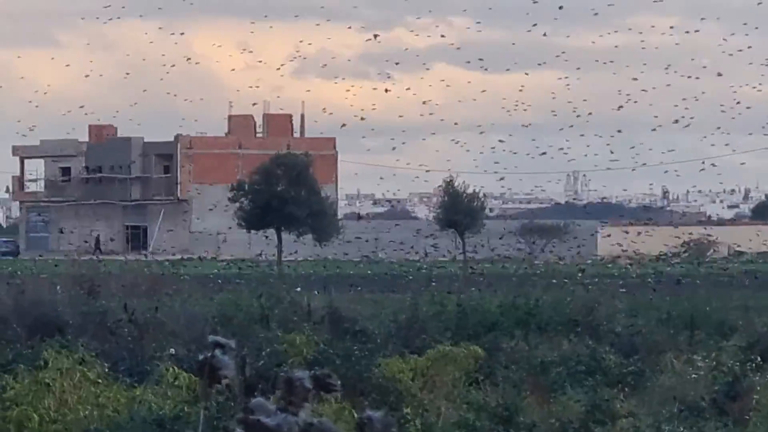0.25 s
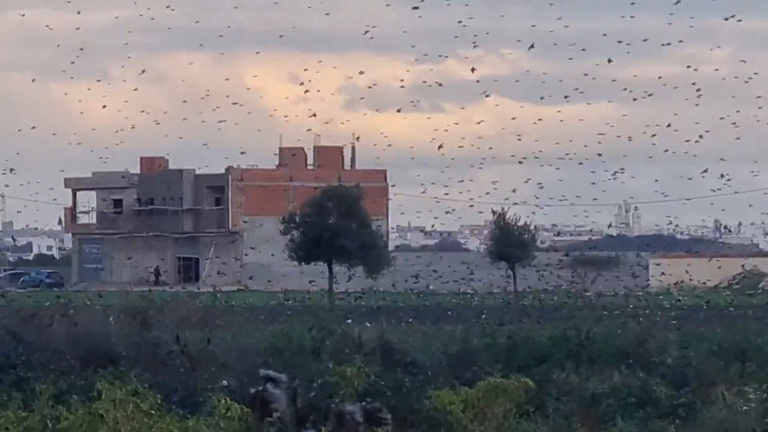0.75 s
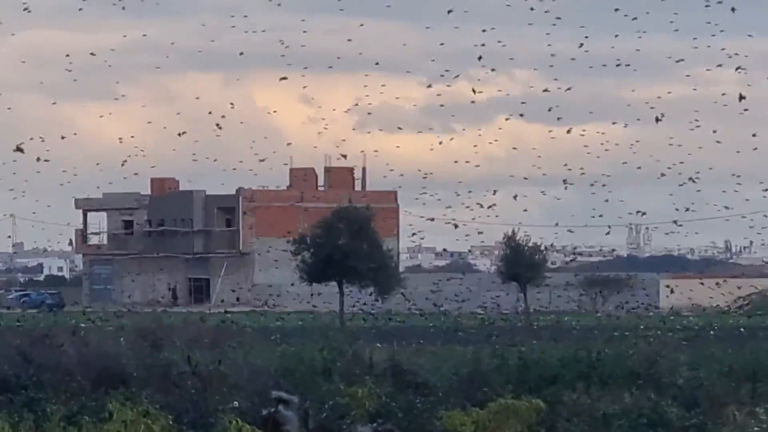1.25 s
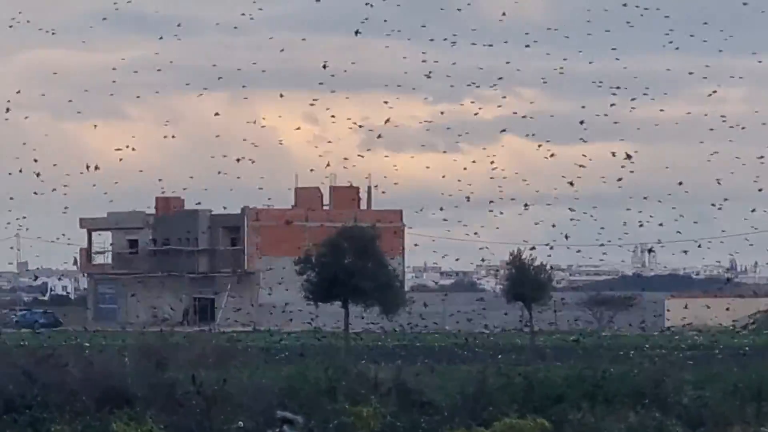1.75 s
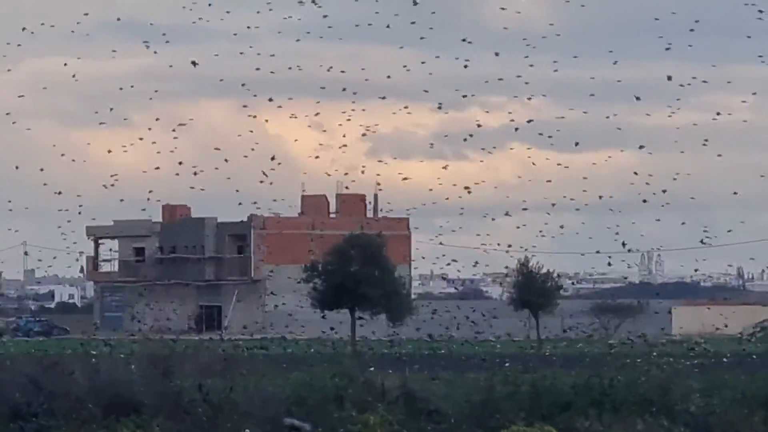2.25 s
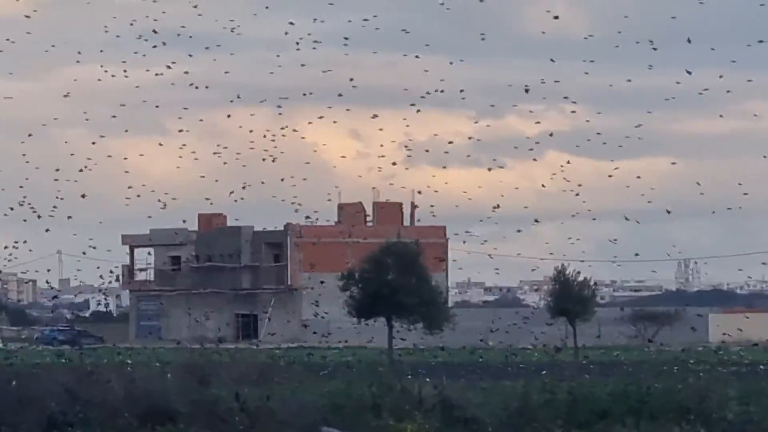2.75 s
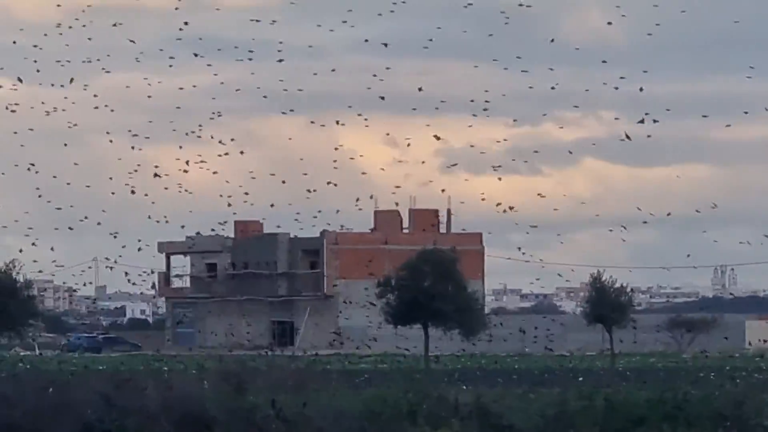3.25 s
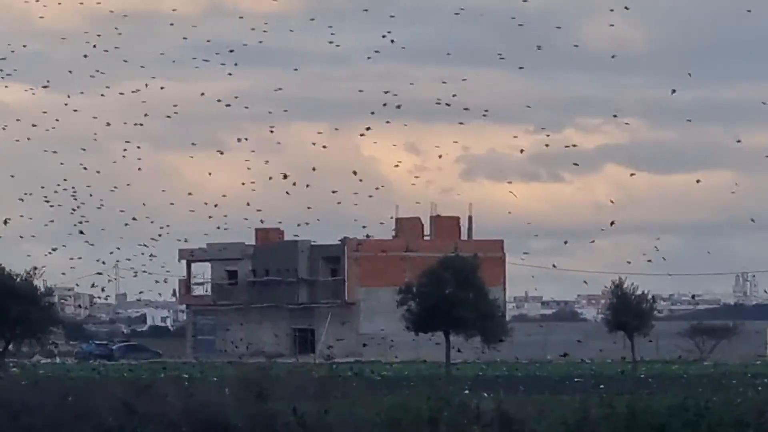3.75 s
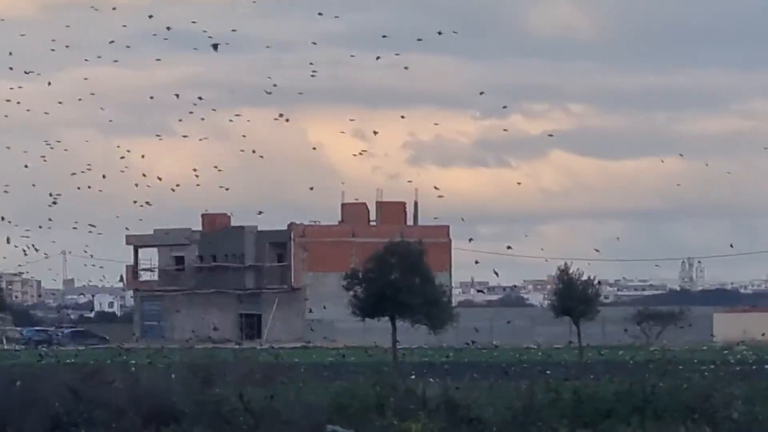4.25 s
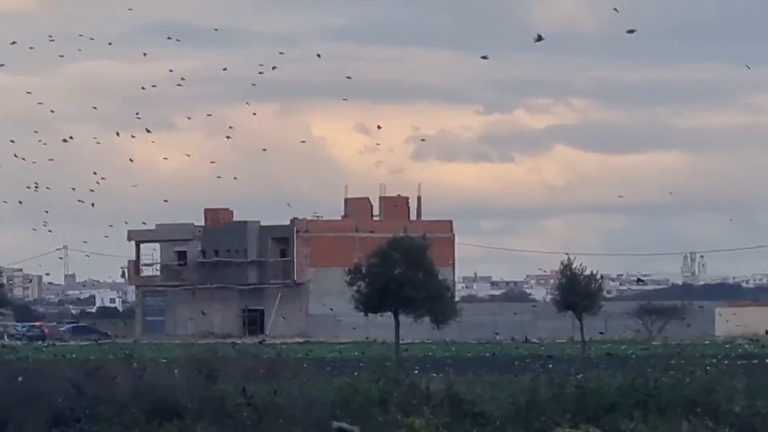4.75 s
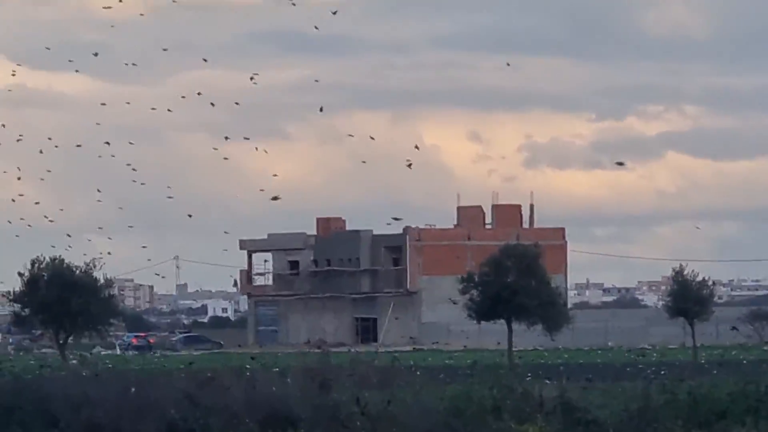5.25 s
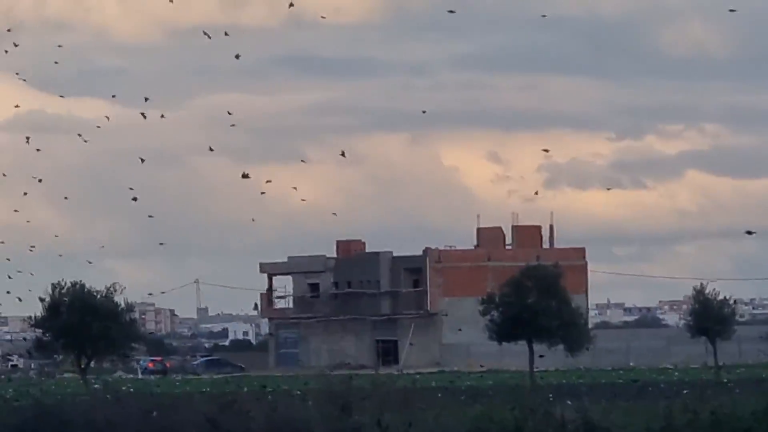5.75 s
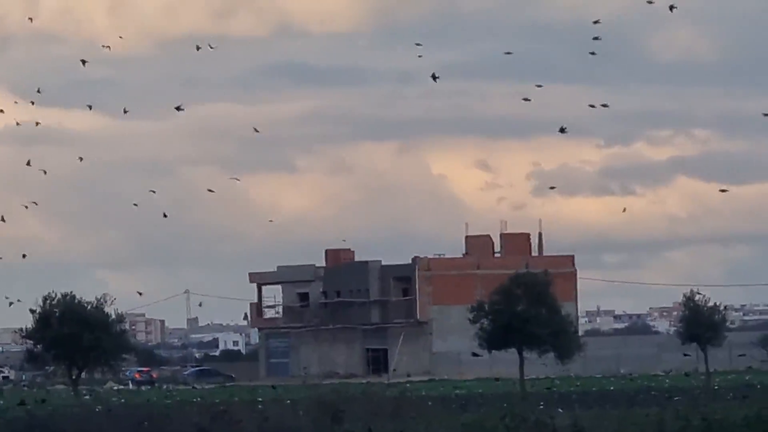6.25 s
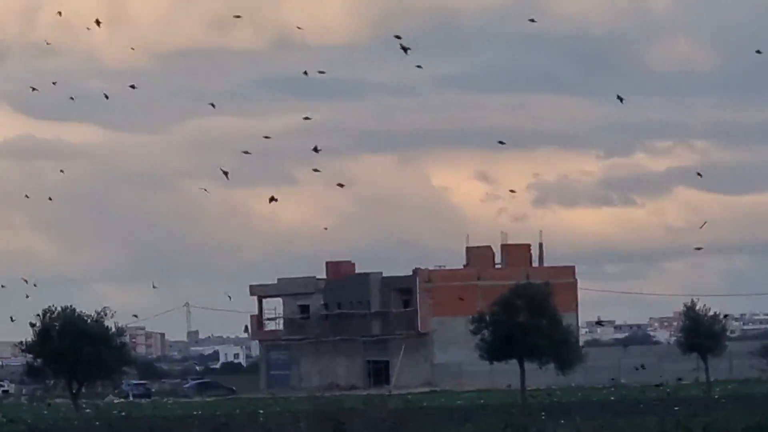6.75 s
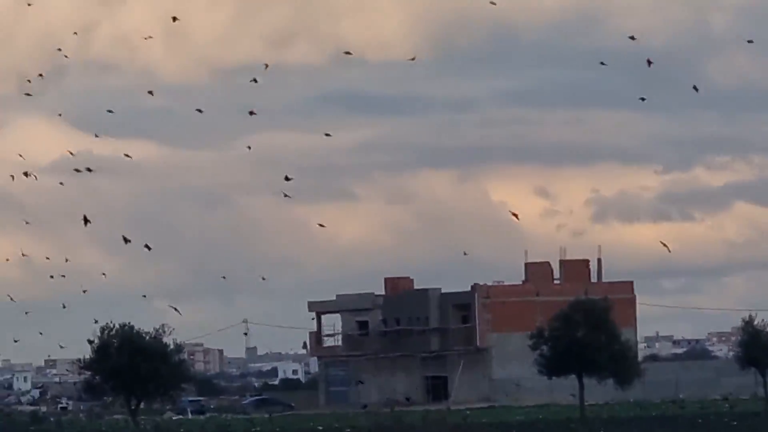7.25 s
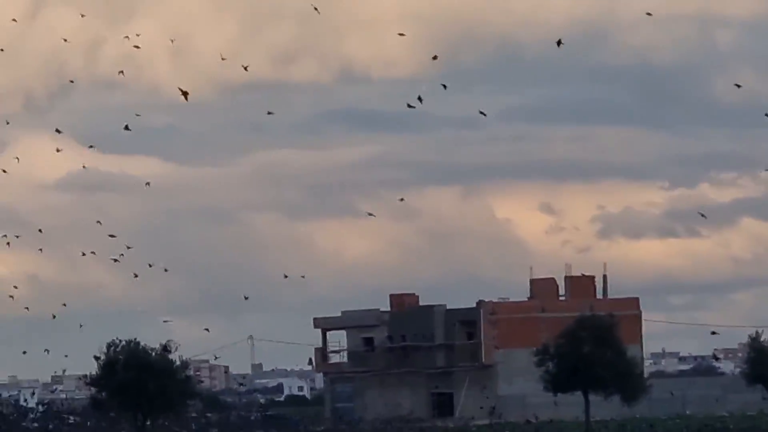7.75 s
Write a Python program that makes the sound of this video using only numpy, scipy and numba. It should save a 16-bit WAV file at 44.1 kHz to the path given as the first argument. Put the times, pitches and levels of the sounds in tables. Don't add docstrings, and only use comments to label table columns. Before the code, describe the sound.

A continuous, dense sheet of bird chatter fills a wide outdoor space from the start, leaning left. Tiny descending chirps merge into a sizzling texture, with irregular near whistles and low rasps on top. Far heavy engines throb in the bass, stronger in the first half and dropping briefly before two seconds. Faint tyre hiss and narrow passing whines come from the right. The stereo pickup is open, with little echo and slight hiss.

```python
import sys
import numpy as np
from scipy import signal
from scipy.fft import rfft, irfft, next_fast_len
from scipy.io import wavfile
from scipy.ndimage import uniform_filter1d, map_coordinates
from numba import njit

SR = 44100
rng = np.random.default_rng(int(sys.argv[2]) if len(sys.argv) > 2 else 0)


def invert_db(level):
    return 10 ** (np.asarray(level, dtype=float) / 20)


def transcribe(signal):
    frames = np.atleast_2d(signal).T
    limited = np.clip(frames, -1, 1)
    pcm = np.round(limited * 32767).astype(np.int16)
    wavfile.write(sys.argv[1], SR, pcm)


N = 353108
PORT_LAG = 22 / SR


def unit(x):
    return x / np.sqrt(np.mean(x ** 2) + 1e-20)


def along(points, hz):
    point_hz, value = np.transpose(points)
    return np.interp(np.log(hz + 1), np.log(point_hz + 1), value)


def curves(rows):
    time_s, *columns = np.transpose(rows)
    t = np.arange(N) / SR
    return [np.interp(t, time_s, column) for column in columns]


def wobble(rate):
    knots = rng.standard_normal(int(N * rate / SR) + 4)
    return map_coordinates(knots, [np.arange(N) * rate / SR])


def filtered(x, response):
    m = next_fast_len(N + 8192)
    hz = np.fft.rfftfreq(m, 1 / SR)
    return irfft(rfft(x, m) * response(hz), m)[..., :N]


def at_ports(shared, own, alike, lag):
    def share(hz):
        return np.clip(along(alike, hz), 0, 1)

    def arrive(hz):
        half_lag_each_way = np.exp(1j * np.pi * hz * lag * np.array([[1], [-1]]))
        return np.sqrt(share(hz)) * half_lag_each_way

    return filtered(shared, arrive) + filtered(own, lambda hz: np.sqrt(1 - share(hz)))


def wash(spectrum, alike, lag, patchy_db):
    z = signal.stft(rng.standard_normal((3, N)), nperseg=512)[2]
    field = rng.standard_normal(z.shape[1:])
    field = uniform_filter1d(field, size=4, axis=0)
    field = uniform_filter1d(field, size=20, axis=1)
    noise = signal.istft(z * invert_db(patchy_db * unit(field)), nperseg=512)[1][:, :N]
    stereo = at_ports(noise[0], noise[1:], alike, lag)
    return unit(filtered(stereo, lambda hz: invert_db(along(spectrum, hz))))


def gusts(calm_db, swells, width_s):
    t = np.arange(N) / SR
    gain = invert_db(calm_db)
    for s, db in swells:
        gain = gain + invert_db(db) * np.exp(-((t - s) / width_s) ** 2)
    return 20 * np.log10(gain)


def lorries():
    # start_s, pitch_hz
    shaft_turns = [(0, 25.2), (1.3, 26), (2.2, 26.6), (3.5, 27.3), (4.5, 27.8), (6.0, 27.8), (8.01, 27.6)]
    # start_s, level_db
    drone_carry = [(0, -44), (.5, -39.5), (1.05, -41.5), (1.31, -33), (1.6, -46), (1.95, -38),
                   (2.25, -33.5), (2.55, -42), (2.95, -44.5), (3.5, -35.5), (4.1, -37.5), (4.26, -33),
                   (4.64, -38), (5.0, -43), (5.4, -47.5), (6.0, -43), (6.8, -48.5), (8.01, -47)]
    # centre_s, level_db
    steady_swells = [(0, -32.5), (.4, -35.5), (.8, -47), (1.6, -43), (1.94, -38), (2.5, -58), (3.5, -40),
                     (4.12, -46), (4.62, -35), (5.619, -38), (5.9, -41.5), (6.3, -45), (7.35, -52),
                     (4.35, -51), (5.1, -45), (2.3, -42), (7.74, -40), (6.5, -49), (6.85, -41)]
    # start_s, pitch_hz
    climb_pitch = [(0, 74.2), (1, 77.4), (2, 81), (2.7, 84.28), (4, 85.37), (6, 86.26), (8.01, 85.5)]
    # centre_s, level_db
    climb_swells = [(.25, -46), (.8, -50), (1.3, -49), (1.6, -45), (2.0, -50), (2.5, -44.5), (3.0, -41.5),
                    (3.62, -41), (4.05, -47), (5.0, -43.5), (5.4, -49), (6.2, -54), (6.75, -46.5),
                    (7.72, -41.5), (7.95, -59)]
    # start_s, pitch_hz, level_db
    pulling_lorry = [(0, 128, -79), (1.92, 132.5, -73), (2.67, 136.5, -72), (3.05, 140.3, -55),
                     (4.5, 146.8, -59.5), (5.3, 150.3, -61.5), (6.2, 151.9, -53), (7.0, 151.2, -65),
                     (8.01, 148.5, -63.5)]
    # start_s, pitch_hz, level_db
    pull_undertone = [(0, 68, -62), (1.4, 69, -42), (2.3, 70.5, -50), (3.7, 72, -51), (4.4, 72, -45),
                      (5.5, 71.7, -46), (6.8, 72, -48.5), (8.01, 70.3, -51)]
    # pitch_hz, density_db (per Hz)
    rumble_colour = [(15, -30), (25, -14), (40, -1.5), (50, 1), (62, -5), (75, 2.5), (92, -6.5), (130, -14),
                     (180, -27.5), (300, -38), (500, -76.5)]

    (shaft_hz,), (drone_db,) = curves(shaft_turns), curves(drone_carry)
    (climb_hz,), (pull_hz, pull_db) = curves(climb_pitch), curves(pulling_lorry)
    under_hz, under_db = curves(pull_undertone)
    t = np.arange(N) / SR
    voices = [
        (2 * shaft_hz, drone_db + 2.2 * wobble(7), .5),
        (63.6 + 0 * t, gusts(-46.5, steady_swells, width_s=0.071), 1.0),
        (climb_hz, gusts(-54.5, climb_swells, width_s=0.14), .8),
        (pull_hz, pull_db - 1, .25),
        (under_hz, under_db + 1.9 * wobble(5), .8),
        (shaft_hz, -62.5 + 3 * wobble(3), 1.0)]
    tones = np.zeros(N)
    for hz, db, shake_hz in voices:
        phase = 2 * np.pi * np.cumsum(hz + shake_hz * wobble(6)) / SR
        tones += invert_db(db) * np.cos(phase)
    tones = at_ports(tones, 0 * tones, [(50, 0.65)], PORT_LAG) * invert_db([[-.5], [.5]])

    lull_s, lull_length_s, lull_db = 1.757, 0.11, -16
    lull = invert_db(lull_db * np.exp(-((t - lull_s) / lull_length_s) ** 4))
    likeness = [(25, 0.63), (60, 0.92), (130, 1.0), (300, 1.0)]  # Hz, left-right share
    rumble = invert_db(-46.0 + 0.96 * wobble(3.1)) * wash(rumble_colour, likeness, PORT_LAG, patchy_db=1.5)
    return lull * tones + rumble


def road():
    # start_s, level_db
    traffic = [(0, -55.5), (.35, -57), (1.2, -56.5), (2.07, -56.5), (2.4, -56.5), (2.85, -57), (3.12, -56),
               (3.73, -58.5), (4.97, -56.5), (5.46, -58), (6.62, -57), (7.16, -56.5), (8.01, -56.5)]
    # pitch_hz, density_db (per Hz)
    body_colour = [(100, -29), (170, -3.5), (448, -4), (545, 0), (647, -3), (877, -2), (1100, -15),
                   (1430, -21), (2420, -120)]
    # pitch_hz, density_db (per Hz)
    tyre_colour = [(530, -18.5), (900, -1.5), (1090, -2), (1410, -1), (1670, -3.5), (1970, -1.5),
                   (2330, -10), (2600, -9), (3380, -33.5), (5720, -120)]
    # pitch_hz, share (0 to 1)
    road_alike = [(200, 0.9), (350, 0.69), (600, 0.48), (900, 0.16), (1400, 0.25), (2500, 0.38)]
    # start_s, length_s, pitch_hz, width_hz, level_db
    tyre_whines = [(1.8, .5, 890, 40, -62), (2.2, .65, 885, 30, -61), (1.93, .22, 1130, 80, -60),
                   (6.9, .8, 600, 110, -59.5), (3.05, .3, 1400, 80, -65), (1.5, 1.3, 760, 160, -59.5),
                   (6.9, 1.1, 800, 150, -60), (2.2, .45, 370, 40, -66), (3.4, .35, 310, 50, -65),
                   (4.45, .95, 280, 50, -66), (5.0, .25, 970, 70, -64)]

    traffic_db, = curves(traffic)
    mean_db = traffic_db.mean()
    swing_db = traffic_db - mean_db
    body_db = mean_db + 0.48 * swing_db
    hiss_db = mean_db - 1 + 1.9 * swing_db
    body = invert_db(body_db + 1.0) * wash(body_colour, road_alike, lag=-3e-5, patchy_db=1.06)
    hiss = invert_db(hiss_db + 3.0) * wash(tyre_colour, road_alike, lag=-0.000074, patchy_db=1.4)
    t = np.arange(N) / SR
    whines = np.zeros(N)
    for s, length, hz, width, db in tyre_whines:
        arch = np.sin(np.pi * np.clip((t - s) / length, 0, 1))
        band = filtered(rng.standard_normal(N), lambda f: np.exp(-((f - hz) / width) ** 2))
        whines += invert_db(db) * arch * unit(band)
    return body * invert_db([[-.7], [.7]]) + hiss * invert_db([[-1.6], [1.6]]) + whines * invert_db([[-1.5], [1.5]])


@njit
def chirps(rows, n, rate, bend, warble_hz):
    out = np.zeros(n + rate)
    for s, length, hz0, hz1, gain, flutter, depth in rows:
        phase = 0.0
        steps = int(length * rate)
        for i in range(steps):
            u = i / steps
            shake = depth * np.sin(2 * np.pi * flutter * (s + u * (1 + u) * length))
            hz = hz0 + (hz1 - hz0) * u ** bend + warble_hz * shake
            phase += 2 * np.pi * hz / rate
            out[int(s * rate) + i] += gain * np.sqrt(np.sin(np.pi * u)) * (1 + shake) * np.sin(phase)
    return out[:n]


def passers():
    u = rng.random((30, 5))
    start_s = u[:, 0] * (N / SR - .1)
    length_s = 0.013 + 0.047 * u[:, 2]
    hz = 2600 + 5200 * u[:, 1]
    end_hz = hz * (1.02 - 0.2 * u[:, 3] ** 2)
    db = -64 + 2 * (2 * u[:, 4] - 1) - 2.0 * np.abs(hz - 4500) / 1000
    return np.transpose([start_s, length_s, hz, end_hz, db])


def near_birds():
    # start_s,
    # length_s, start_hz, end_hz, level_db
    single_calls = [(.678, .028, 7400, 6200, -55), (.79, .025, 7800, 7000, -59), (1.032, .021, 7090, 7000, -57),
                    (1.092, .016, 6600, 8100, -51), (1.108, .026, 8050, 6200, -46),
                    (1.135, .055, 5500, 4900, -47), (1.235, .05, 7500, 6800, -56),
                    (1.365, .03, 8000, 5600, -54), (1.385, .03, 7600, 5600, -54),
                    (1.435, .026, 7180, 6370, -55), (1.575, .068, 6800, 6030, -58),
                    (1.668, .022, 5450, 5400, -49), (1.85, .025, 7000, 6250, -52),
                    (2.515, .03, 5300, 4500, -51), (2.802, .03, 6370, 5400, -51),
                    (3.242, .017, 7050, 5950, -57), (3.618, .024, 4800, 4350, -49),
                    (3.822, .022, 7250, 6250, -52), (5.027, .038, 5800, 5170, -53),
                    (5.364, .048, 6660, 5000, -54), (5.683, .028, 5510, 5080, -52),
                    (5.715, .019, 5970, 5710, -52), (6.297, .039, 7650, 6420, -59),
                    (7.426, .052, 6650, 6190, -59),
                    (.39, .035, 4900, 4000, -50), (.405, .05, 4300, 3500, -54), (1.187, .068, 3770, 3840, -54),
             (1.469, .023, 5000, 5000, -55), (1.689, .057, 4820, 4700, -54), (1.745, .03, 4150, 3800, -49),
             (2.029, .041, 4440, 4720, -54), (2.119, .039, 5030, 4710, -53), (2.199, .034, 3960, 3690, -51),
             (2.895, .028, 4630, 4520, -54), (3.259, .035, 4900, 4300, -52), (3.352, .02, 3800, 3850, -55),
             (3.458, .016, 4400, 4150, -49), (3.475, .04, 3850, 3650, -50), (4.088, .05, 3800, 3650, -52),
             (4.618, .022, 3740, 3490, -54), (5.715, .042, 4770, 4770, -52), (5.721, .019, 3790, 3790, -52),
             (6.285, .03, 5000, 4750, -51), (6.305, .017, 3500, 3900, -52), (6.393, .039, 2810, 2810, -54),
             (6.494, .023, 4290, 4370, -51), (7.223, .028, 4800, 4290, -53), (7.445, .025, 4400, 4000, -53),
             (7.455, .045, 3900, 3600, -51),
                    (.503, .042, 4820, 4820, -57), (1.255, .036, 5460, 5460, -56),
               (1.493, .039, 4310, 4230, -55), (1.617, .057, 7360, 7160, -60),
               (1.79, .055, 3350, 2900, -57), (1.869, .03, 4250, 3900, -53), (2.44, .035, 4900, 4400, -55),
               (2.57, .065, 4050, 3450, -54), (2.656, .048, 4370, 4330, -54), (2.93, .02, 4150, 3950, -53),
               (2.97, .04, 4000, 3650, -53), (3.432, .035, 6250, 5180, -57), (4.259, .057, 2970, 2880, -59),
               (4.634, .036, 4900, 4750, -57), (5.422, .03, 5300, 4500, -53), (5.525, .03, 4250, 4150, -52),
               (5.574, .018, 3680, 3720, -53), (5.756, .025, 4140, 4050, -53),
               (6.117, .036, 3850, 3550, -55), (6.278, .025, 5350, 5550, -53),
               (7.149, .042, 4360, 4360, -56), (7.726, .074, 3720, 3610, -58),
                    (.39, .04, 5000, 4300, -52), (.453, .04, 3270, 3110, -54), (1.0, .04, 6540, 6380, -59),
              (1.118, .035, 6600, 5270, -57), (1.161, .04, 7040, 6320, -58), (1.377, .04, 5560, 5560, -54),
              (1.429, .04, 7100, 7400, -60), (1.554, .04, 7990, 6390, -58), (1.625, .04, 4250, 4400, -54),
              (1.715, .018, 4300, 4450, -51), (1.79, .018, 4100, 4200, -53), (2.097, .045, 7090, 7290, -58),
              (2.525, .035, 4770, 4370, -52), (2.585, .02, 5050, 4950, -53), (2.72, .045, 3700, 3300, -55),
              (2.452, .02, 4450, 4600, -53), (4.08, .06, 3050, 2900, -60), (2.949, .035, 3750, 2800, -56),
              (2.995, .04, 5980, 5820, -58), (2.999, .04, 3630, 3030, -56), (3.358, .04, 3960, 2840, -55),
              (3.485, .03, 4000, 3550, -51), (3.535, .025, 5000, 4950, -54), (4.6, .04, 4810, 3210, -53),
              (4.785, .04, 6140, 6340, -58), (5.39, .04, 3350, 3190, -56), (5.385, .035, 5400, 5050, -53),
              (5.49, .035, 4150, 4300, -53), (5.6, .016, 3750, 3650, -54), (5.775, .04, 7440, 7640, -61),
              (5.835, .025, 4300, 4350, -54), (6.252, .04, 2760, 2760, -55), (6.325, .028, 3800, 3680, -50),
              (6.348, .02, 3650, 3300, -55), (6.441, .045, 4050, 3750, -55), (6.539, .04, 7480, 7080, -60),
              (7.553, .04, 5850, 6130, -59)]
    overhead = [
        (5.277, .035, 7010, 7010, -67),
        (5.335, .1, 7020, 7000, -66),
        (5.43, .13, 6980, 6850, -71),
    ]
    # pitch_hz, level_db
    port_shadow = [(2800, 0), (3800, -2), (4400, -9), (5100, -4), (6000, -8), (7500, -9.5)]

    rows = np.vstack([single_calls, passers(), overhead])
    s, length, hz0, hz1, right_db = rows.T
    above = np.arange(len(s)) >= len(s) - len(overhead)
    left_db = right_db + np.where(above, 6, along(port_shadow, (hz0 + hz1) / 2))
    flutter_hz = 25 + 35 * rng.random(len(s))
    depth = np.interp(hz0, [5000, 6500], [.6, .12])

    def heard(db, lag):
        port = np.transpose([s + lag, length, hz0, hz1, invert_db(db + 2), flutter_hz, depth]).copy()
        return chirps(port, N, SR, bend=0.9, warble_hz=117.0)

    calls = np.array([heard(left_db, 0), heard(right_db, PORT_LAG * ~above)])
    t = np.arange(SR // 4) / SR
    scatter = rng.standard_normal((2, len(t))) * invert_db(-60 * t / 0.23)
    scatter = invert_db(-10) * scatter / np.linalg.norm(scatter[0])
    return calls + signal.fftconvolve(calls, scatter, axes=1)[:, :N]


def chatter(count, spread_db, fall):
    u = rng.random((count, 5))
    nearness = np.minimum(rng.exponential(size=count), 3.5)
    middle_hz = 1500 + 8000 * u[:, 1]
    sweep_hz = fall * middle_hz ** 2 / 5500 * (u[:, 2] - .2)
    lead = SR // 10
    start_s = u[:, 0] * (N + lead) / SR
    length_s = .018 + .045 * u[:, 3] ** 2
    flutter_hz, depth = 25 + 90 * u[:, 4], 0.26 + .5 * u[:, 3]
    rows = [start_s, length_s, middle_hz + sweep_hz, middle_hz - sweep_hz,
            invert_db(spread_db * nearness), flutter_hz, depth]
    calls = chirps(np.transpose(rows).copy(), N + lead, SR, bend=.8, warble_hz=176.0)
    return unit(calls[lead:])


def flock():
    # start_s, chatter_db, extra_treble_db
    mass_nearness = [(0, -52.5, -5), (.3, -53, -1), (.6, -53.5, 3), (1.1, -52, -0.5), (1.6, -52, -2),
                     (1.9, -52, -1.5), (2.2, -52.5, 0.5), (2.7, -53.5, 1.5), (3.1, -53.5, -2),
                     (3.5, -53.5, 0.5), (4.3, -53.5, 0.5), (4.9, -54, 0), (5.4, -53.5, -2), (5.75, -53, -2),
                     (6.3, -53, 0), (6.9, -54, 0), (7.45, -53, 0), (8.01, -53.5, -2)]
    # pitch_hz, level_db
    left_colour = [(1500, 8), (2000, 4), (2400, 0), (2800, 1), (3300, 1), (3850, -2.5), (4200, -2),
                   (4650, -3.5), (4900, -2), (5600, -5), (6000, -10.5), (6250, -8), (6500, -11.5),
                   (6900, -8), (7500, -15.5), (7900, -14.5), (8200, -19), (9400, -28)]
    # pitch_hz, level_db
    right_colour = [(1500, 5.5), (2000, 6.5), (2400, -11), (2800, -0.5), (3300, -0.6), (3800, 1.5),
                    (4400, 2.5), (5000, 1.5), (5600, -2), (6000, -8.5), (6400, -5.5), (6900, -3.5),
                    (7500, -7), (7900, -15.5), (8200, -21), (9400, -45.5)]
    # pitch_hz, share (0 to 1)
    from_left = [(1500, 1), (3000, 0.26), (5000, 0.23), (7000, 0.078), (9000, 0.06)]

    chatter_db, turn_db = curves(mass_nearness)
    treble_db = -10.5 + 1.3 * (chatter_db - chatter_db.mean()) + turn_db + .6 * wobble(7)
    voices = []
    for _ in range(3):
        hiss = invert_db(-1.5) * rng.standard_normal(N)
        voices.append(chatter(count=10000, spread_db=0.9, fall=0.1686) + hiss)
    mass = at_ports(voices[0], np.array(voices[1:]), from_left, PORT_LAG)

    def colour(hz):
        ports = invert_db([along(left_colour, hz), along(right_colour, hz)])
        return ports / (1 + (hz / 9500) ** 30)

    def low_band(hz):
        return colour(hz) / (1 + (2300 / (hz + 1)) ** 8) / np.sqrt(1 + (hz / 6000) ** 12)

    def high_band(hz):
        return colour(hz) / np.sqrt(1 + (6000 / (hz + 1)) ** 12)

    low = invert_db(chatter_db + 1.5) * unit(filtered(mass, low_band))
    high = invert_db(chatter_db + treble_db + 2.5) * unit(filtered(mass, high_band))
    return low + high


def scene():
    return lorries() + road() + near_birds() + flock()


def top_cut(x):
    return signal.sosfilt(signal.butter(12, 15720, fs=SR, output="sos"), x)


def record(dry):
    # pitch_hz, density_db (per Hz)
    self_noise = [(8500, -34), (9600, -2.5), (10300, -7.5), (11200, -10.5), (12500, -4), (15700, -6)]
    hiss = invert_db(-86.0) * wash(self_noise, [(9000, 0.18), (13000, .3)], lag=0, patchy_db=0.0)
    return top_cut(dry + hiss * invert_db([[-1.2], [1.2]]))


dry = scene()
out = record(dry)
transcribe(out)
```